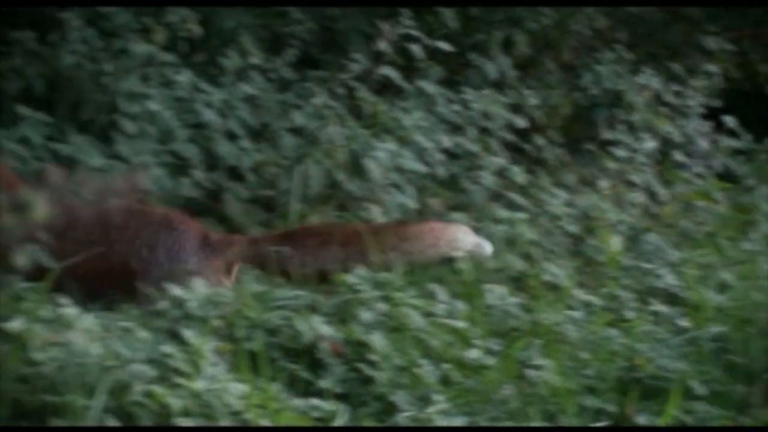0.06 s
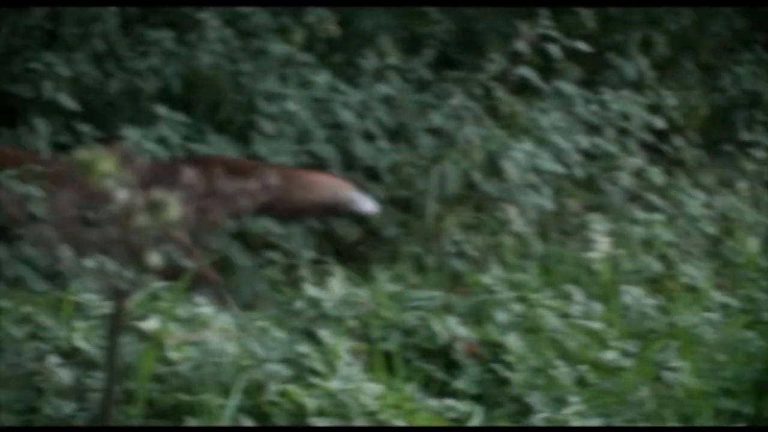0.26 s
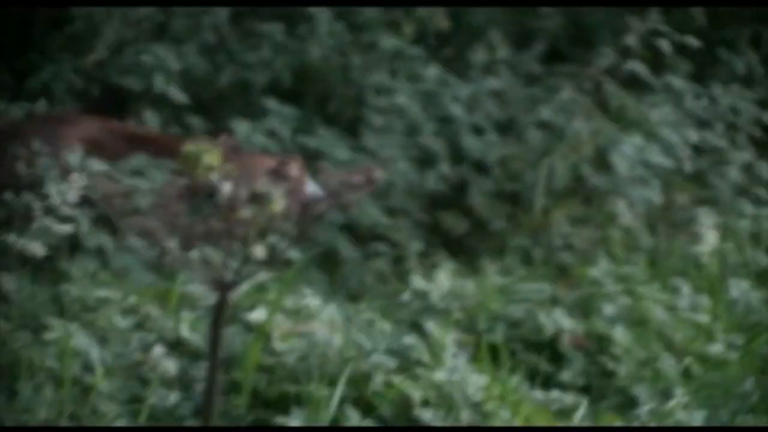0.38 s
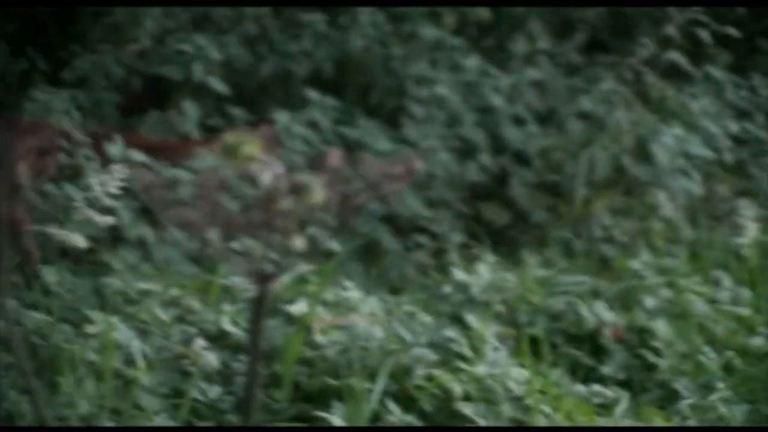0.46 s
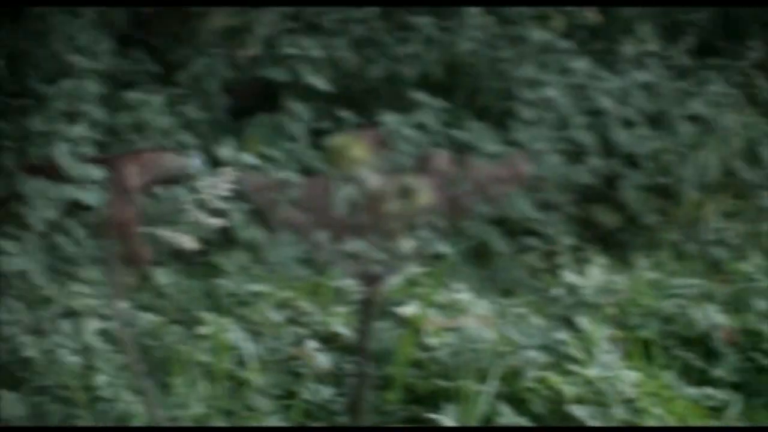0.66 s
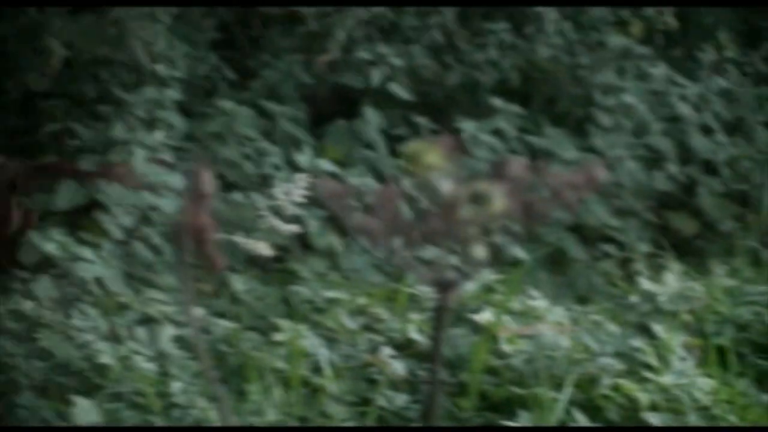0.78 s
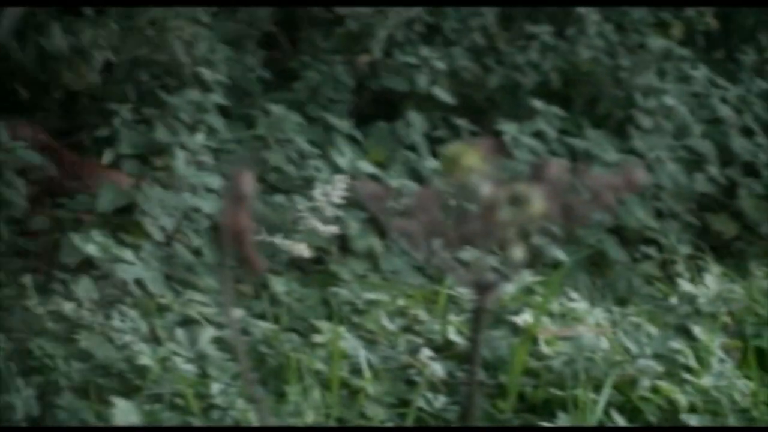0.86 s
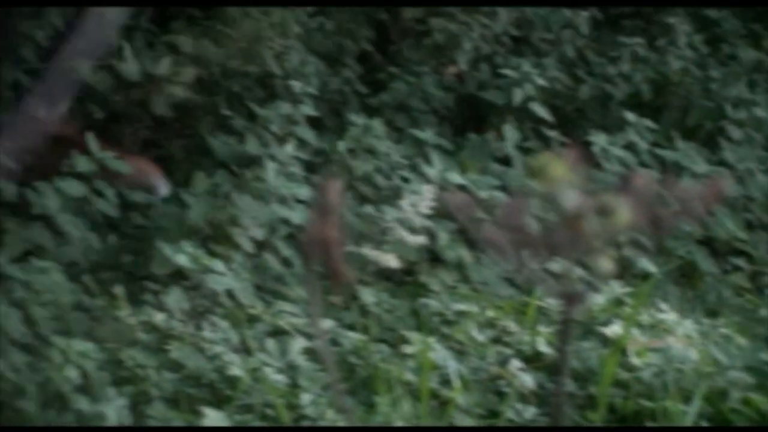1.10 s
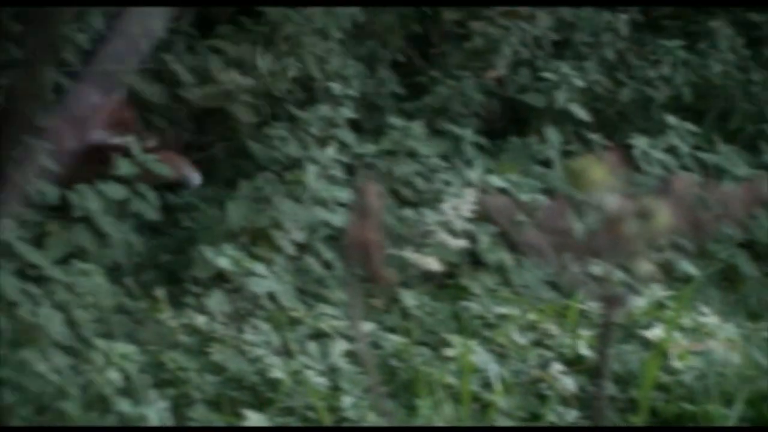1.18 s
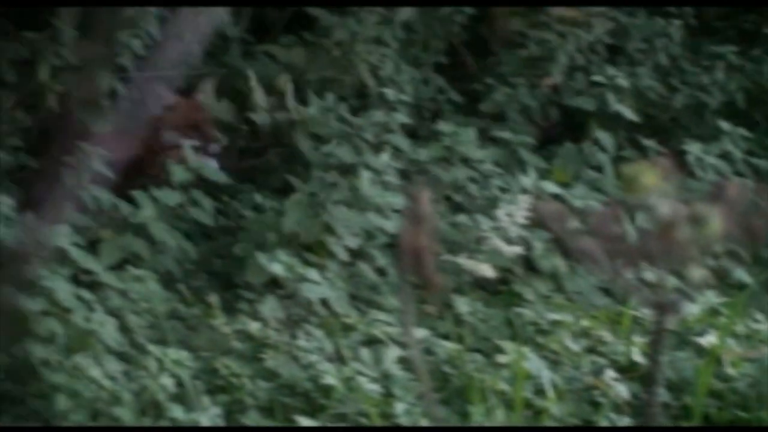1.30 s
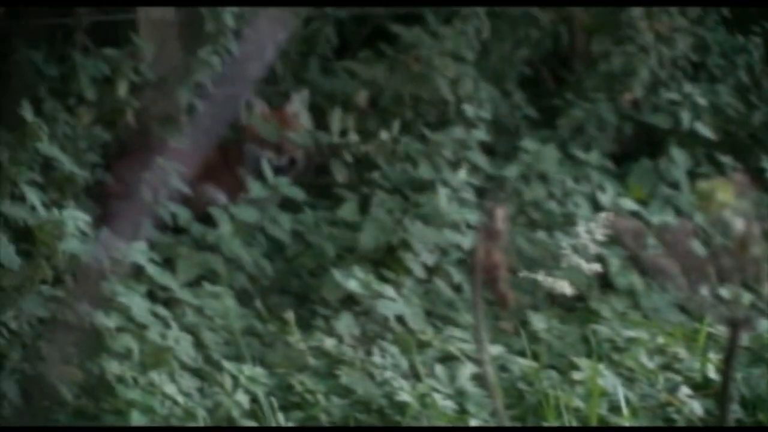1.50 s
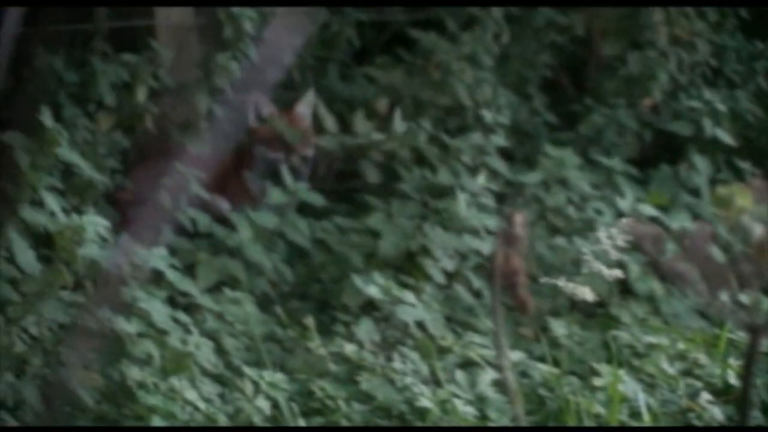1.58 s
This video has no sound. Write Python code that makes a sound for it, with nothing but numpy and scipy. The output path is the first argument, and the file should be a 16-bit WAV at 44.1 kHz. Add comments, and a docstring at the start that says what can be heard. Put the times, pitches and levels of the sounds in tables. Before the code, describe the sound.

A bird flushes in a quiet wood. After faint air, leaves rustle and twigs snap sharply from 0.2 seconds as a fox pushes through. Soft loose flaps and high squeaks come around 0.4-0.8, with stem knocks near 0.8-0.9. From 0.93 to about 1.4 a loud whirr of hollow, feathery double thumps crosses toward the right, with shrill, raspy whistles until 1.3, then fades into thinning rustle.

```python
"""A bird flushes from dense undergrowth: loose wing flaps, then a whirr at fourteen beats a second.
Each beat has two strokes, each a swish of feathers, a puff of air and a hollow, sagging thump.
Shrill alarm notes are gliding whistles; shaking their pitch makes some of them harsh.
A fox pushes through: leaves rustle as sprays of grains, twigs snap as noise bursts, stems knock
as short tones. Coloured noise gives faint air and a low rumble of movement."""
import sys
import numpy as np
from scipy import signal
from scipy.fft import rfft, irfft
from scipy.io import wavfile

SR = 44100
rng = np.random.default_rng(int(sys.argv[2]) if len(sys.argv) > 2 else 0)


def bounce(signal):
    """Save signal as a 16-bit WAV file at the path given by the first command-line argument."""
    frames = np.transpose(np.atleast_2d(signal))
    limited = np.clip(frames, -1, 1)
    pcm = np.round(limited * 32767).astype(np.int16)
    wavfile.write(sys.argv[1], SR, pcm)


N = 72765  # length in samples


def amp(db):
    """Turns decibels into a gain."""
    return 10 ** (np.asarray(db) / 20)


def unit(x):
    """Scales a signal to rms 1."""
    return x / np.sqrt(np.mean(x ** 2) + 1e-20)


def read(points, hz):
    """Reads a table of (Hz, value) between its points, on a log-frequency axis."""
    table_hz, value = np.transpose(points)
    return np.interp(np.log(hz + 1), np.log(table_hz + 1), value)


def level(points):
    """Turns a table of (seconds, dB) into a gain over time."""
    return amp(np.interp(np.arange(N) / SR, *np.transpose(points)))


def colour(x, points):
    """Gives a signal the spectrum of a table of (Hz, dB), at rms 1."""
    gain = amp(read(points, np.fft.rfftfreq(N, 1 / SR)))
    return unit(irfft(rfft(x) * gain, N))


def noise(points, apart):
    """Makes coloured stereo noise; apart is the size of side against mid."""
    mid, side = rng.standard_normal((2, N))
    return colour(np.array([mid + apart * side, mid - apart * side]), points)


def wander(seconds):
    """Makes smooth random movement of rms 1 that changes over the given time."""
    hz = np.fft.rfftfreq(N, 1 / SR)
    smoothing = np.exp(-(2 * hz * seconds) ** 2)
    return unit(irfft(rfft(rng.standard_normal(N)) * smoothing, N))


def pan(db):
    """Gives the two channel gains for a left-right difference in dB; positive is left."""
    return amp(np.array([[.5], [-.5]]) * db)


def since(s):
    """Gives the time since s, zero before it."""
    return np.maximum(np.arange(N) / SR - s, 0)


def burst(s, rise, fall):
    """Makes an envelope with a quick rise to 1 and an exponential decay."""
    t = since(s)
    return np.minimum(t / rise, 1) * np.exp(-np.maximum(t - rise, 0) / fall)


# How long sound lingers among the trees. Each row: frequency in Hz, time to die by 60 dB in seconds.
WOOD_DECAY = [(300, 0.14), (2500, 0.44), (9000, .34)]


def wood(x):
    """Adds diffuse scatter from trunks and leaves, each band dying at its own speed."""
    hz, t, bands = signal.stft(rng.standard_normal((2, SR // 2)), SR, nperseg=256)
    decay = amp(-60 * t / read(WOOD_DECAY, hz)[:, None])
    tail = signal.istft(bands * decay, SR, nperseg=256)[1]
    tail = tail + 0.13 * tail[::-1]  # each side shares a little with the other
    tail = np.pad(tail, ((0, 0), (SR // 200, 0)))  # starts 5 ms late
    return signal.fftconvolve(x, tail / np.linalg.norm(tail[0]), axes=1)[:, :N]


def thicket(x):
    """Makes quick reflections from the ground and the nearest stems."""
    taps = rng.standard_normal((2, N)) * burst(0.00044, rise=0.003, fall=0.0062)
    return signal.fftconvolve(x, taps / np.linalg.norm(taps[0]), axes=1)[:, :N]


# Colour of the still air of the wood. Each row: frequency in Hz, strength in dB.
AIR_COLOUR = [(100, 1.5), (850, 9), (2500, -3), (7000, -15), (15000, -37)]
AIR_DB = -51.5


def still_air():
    """Wide, faint, steady noise stands for the air of the wood."""
    return amp(AIR_DB) * noise(AIR_COLOUR, apart=0.94)


# Loudness of the low rumble of movement. Each row: time in seconds, level in dB.
RUMBLE_LEVEL = [(.19, -53.5), (.29, -44), (.72, -49), (.795, -41.5), (.87, -51), (1, -44), (1.45, -53)]
# Colour of the rumble. Each row: frequency in Hz, strength in dB.
RUMBLE_COLOUR = [(12, -16), (32, -3.5), (65, -13.5), (103, 1.5), (135, -6.5), (400, -37.5)]


def rumble():
    """Low, nearly central noise swells with the movement."""
    return level(RUMBLE_LEVEL) * noise(RUMBLE_COLOUR, apart=0.2)


# Loudness of the rustling leaves before clumping. Each row: time in seconds, level in dB.
RUSTLE_LEVEL = [(.205, -58), (.215, -42), (.245, -40.5), (.32, -40.5), (.39, -46.5), (.455, -38),
                (.5, -46.5), (.62, -44), (.75, -56.5), (.815, -40), (.89, -57), (.96, -42), (1.39, -48.5),
                (1.46, -56.5)]
# Colour of the leaves. Each row: frequency in Hz, strength in dB.
LEAF_COLOUR = [(100, -5), (350, 9.5), (1900, 0), (8000, -1.5), (15000, -13.5)]
GRAINS_PER_S, GRAIN_SPREAD_DB = 7000, 2.8
CLUMP_DB, CLUMP_S = 2, .007


def rustle():
    """Leaves crackle in a dense spray of tiny grains, uneven in strength and place."""
    grains = rng.standard_normal(N) * (rng.random(N) < GRAINS_PER_S / SR)
    grains = grains * amp(GRAIN_SPREAD_DB * np.minimum(rng.exponential(1, N), 4))
    place = 0.4 * rng.standard_normal(N)
    spray = colour(grains * np.array([1 + place, 1 - place]), LEAF_COLOUR)
    clumps = amp(CLUMP_DB * wander(CLUMP_S))
    return level(RUSTLE_LEVEL) * clumps * spray


# Snaps of twigs. Each row: start in seconds, level in dB.
TWIG_SNAPS = [(0.237, -29.5), (.254, -32.5), (0.261, -35.5), (.427, -33)]
# Colour of the snaps and of the crack in each knock. Each row: frequency in Hz, strength in dB.
SNAP_COLOUR = [(200, -31), (1800, 12), (2800, -6), (15000, -3.5)]
# Knocks of stems and stiff leaves. Each row: start in seconds, level in dB, pitch in Hz.
STEM_KNOCKS = [(.238, -26, 1700), (.292, -31, 1890), (.334, -29.5, 1660), (.36, -27, 930),
               (.801, -29.5, 1280), (0.886, -23.5, 940), (.891, -24, 730), (.899, -25.5, 655)]
KNOCK_T60_S, KNOCK_CRACK_DB = 0.014, -13.5  # time to die by 60 dB; crack against ring


def snaps_and_knocks():
    """Twigs break in bursts of noise; struck stems ring as short tones, each with a soft crack."""
    cracks, ring = np.zeros((2, N))
    for s, db in TWIG_SNAPS:
        cracks += amp(db) * burst(s, rise=0.00021, fall=0.005)
    for s, db, hz in STEM_KNOCKS:
        t = since(s)
        ring += amp(db - 60 * t / KNOCK_T60_S) * np.sin(2 * np.pi * hz * t)
        cracks += amp(db + KNOCK_CRACK_DB) * burst(s, rise=0.00075, fall=0.0019)
    return ring + cracks * noise(SNAP_COLOUR, apart=0.33)


LEAF_WET_DB, LEAF_PAN_DB = -5, 2  # scatter against direct sound; left against right


def undergrowth():
    """Rustle, snaps and knocks scatter among the trees, a little to the left."""
    direct = rustle() + snaps_and_knocks()
    return pan(LEAF_PAN_DB) * (direct + amp(LEAF_WET_DB) * wood(direct))


# Notes of the birds; the faint 2.5 kHz note at 0.736 s is a more distant bird. Each row: start in seconds,
# length in seconds, start pitch in Hz, end pitch in Hz, # level in dB before the fade and the mix, rasp (rms
# size of the pitch shake) in Hz.
ALARM_NOTES = [(0.387, 0.021, 6350, 6500, -33.5, 156), (0.401, 0.05, 9450, 9600, -35.5, 100),
               (0.395, 0.05, 8600, 7950, -36.5, 172), (0.423, 0.024, 7600, 5300, -31, 570),
               (0.512, .03, 5240, 5525, -35.5, 260), (.515, 0.0085, 6900, 7050, -27.5, 139),
               (.516, 0.049, 8700, 6200, -33, 897.4), (.544, 0.025, 5690, 5640, -30, 80.2),
               (0.568, .05, 5640, 5560, -56.5, 150), (.736, 0.09, 2520, 2560, -50, 35),
               (.927, 0.049, 10000, 9550, -30.5, 130), (.928, 0.12, 8500, 8200, -32, 593),
               (0.923, .12, 6450, 5300, -36, 461), (1.018, 0.051, 6960, 7090, -31.5, 70),
               (1.115, 0.062, 5920, 6120, -28.5, 135), (1.169, 0.027, 4560, 4580, -38.5, 65.6),
               (1.173, 0.049, 5900, 5780, -34, 150), (1.269, 0.042, 5000, 4480, -34, 199),
               (1.237, 0.086, 5900, 5450, -40.5, 108)]
NOTE_RISE_S, NOTE_FALL_S, NOTE_FADE_DB = .005, .008, -4.5  # the fade runs from start to end
NOTE_ARCH_HZ, RASP_PER_S = 89.1, 400  # upward bend at mid-note; speed of the pitch shake
OVERTONE_DB, OVERTONE_TOP_HZ = -14, 13170
NOTE_DRY_DB, NOTE_WET_DB, NOTE_PAN_DB = -3, -3.5, -1


def alarm():
    """Arched, fading whistles; a fast uneven shake of pitch makes some of them rasp."""
    voice = np.zeros(N)
    for s, length, start_hz, end_hz, db, rasp_hz in ALARM_NOTES:
        t = since(s)
        along = np.minimum(t / length, 1)  # 0 at the start of the note, 1 at its end
        glide = start_hz + (end_hz - start_hz) * along
        arch = glide + NOTE_ARCH_HZ * np.sin(np.pi * along)
        shake = rasp_hz * wander(.5 / RASP_PER_S)
        phase = 2 * np.pi * np.cumsum(arch + shake) / SR
        rise = np.minimum(t / NOTE_RISE_S, 1)
        fall = np.clip((length - t) / NOTE_FALL_S + .5, 0, 1)
        overtone = amp(OVERTONE_DB) * (2 * arch < OVERTONE_TOP_HZ) * np.sin(2 * phase)
        whistle = np.sqrt(2) * (np.sin(phase) + overtone)
        voice += amp(db + NOTE_FADE_DB * along) * rise * fall * whistle
    both = np.array([voice, voice])
    near = amp(NOTE_DRY_DB) * (both + .5 * thicket(both))
    return pan(NOTE_PAN_DB) * (near + amp(NOTE_WET_DB) * wood(both))


# Beats of the wings. Each row: start in seconds, first thump level in dB, its pitch in Hz,
# second thump level in dB, its pitch in Hz, feather swish level in dB.
# Each pitch is the one at the thump's peak.
WINGBEATS = [(0.446, -33.5, 481, -46, 644, -40), (.524, -35, 580, -31.5, 683, -37.5),
             (.597, -34, 690, -39, 524, -39), (0.76, -36.5, 623, -29, 537, -41),
             (.932, -19.5, 550, -20.5, 525, -32), (1.002, -25.5, 472, -22, 500, -30.5),
             (1.074, -20.5, 510, -17.5, 411.5, -31.5), (1.1442, -23, 457, -20, 442, -28.5),
             (1.217, -21.5, 471, -16, 381, -29.5), (1.289, -22, 612, -20, 411, -29),
             (1.363, -29, 368, -27, 366, -30.5)]
# Colour of the feathers. Each row: frequency in Hz, strength in dB.
FEATHER_COLOUR = [(300, -2), (900, 6.5), (1400, -4.5), (2000, -2.5), (2350, 11), (2700, 0), (3150, 6),
                  (3900, -8), (7000, -11), (15000, -28)]
# Colour of the puff of air. Each row: frequency in Hz, strength in dB.
PUFF_COLOUR = [(200, -33), (350, 6), (550, 1.5), (1400, -30)]
# Bass that each beat sets ringing. Each row: pitch in Hz, level against the swish level in dB,
# time to die by 60 dB in seconds.
BASS_THROB = [(39.15, -12, 0.81), (112.9, -10.5, 0.5)]
STROKE_GAP_S, PEAK_S, SECOND_PEAK_S = .0185, .0045, .0062  # each peak is timed from its stroke
THUMP_SHAPE, SAG_PER_S = 3.2, 20  # higher shape, shorter thump; rate of the pitch sag
SWISH_LEAD_S, SWISH_RISE_S, SWISH_FALL_S = .0012, 0.0027, 0.0093
SECOND_SWISH_DB, PUFF_DB = -3.5, -8.5  # against the first swish; against the thump
FEATHER_GRAIN_DB, FEATHER_GRAIN_S = 3, .0007
WING_ECHO_DB, WING_WET_DB = -14, -10.5  # quick reflections; scatter of the wood
WING_PAN_DB_PER_S, WING_CENTRE_S = -5.5, 0.8  # the bird crosses from left to right


def wings():
    """Each stroke is a feather swish, a puff and a hollow thump that sags in pitch; bass throbs below."""
    thump, swish, puff, throb = np.zeros((4, N))
    for s, first_db, first_hz, second_db, second_hz, swish_db in WINGBEATS:
        strokes = (
            (s, first_db, first_hz, PEAK_S, swish_db),
            (s + STROKE_GAP_S, second_db, second_hz, SECOND_PEAK_S, swish_db + SECOND_SWISH_DB),
        )
        for at, db, hz, peak, feather_db in strokes:
            t = since(at)
            push = amp(db) * (t / peak * np.exp(1 - t / peak)) ** THUMP_SHAPE
            pitch = (t > 0) * hz * np.exp(-SAG_PER_S * (t - peak))
            thump += push * np.sin(2 * np.pi * np.cumsum(pitch) / SR)
            puff += amp(db) * burst(at, rise=0.0045, fall=0.0064)
            swish += amp(feather_db) * burst(at - SWISH_LEAD_S, SWISH_RISE_S, SWISH_FALL_S)
        t = since(s)
        for hz, db, t60 in BASS_THROB:
            throb += amp(swish_db + db - 60 * t / t60) * np.sin(2 * np.pi * hz * t)
    slaps = unit(amp(FEATHER_GRAIN_DB * wander(FEATHER_GRAIN_S)))  # single feathers strike unevenly
    air_puffs = amp(PUFF_DB) * puff * noise(PUFF_COLOUR, apart=0.035)
    feathers = np.sqrt(2) * swish * slaps * noise(FEATHER_COLOUR, apart=0.32)
    direct = thump + air_puffs + feathers
    around = amp(WING_ECHO_DB) * thicket(direct) + amp(WING_WET_DB) * wood(direct)
    side_db = WING_PAN_DB_PER_S * (since(0) - WING_CENTRE_S)
    return pan(side_db) * (direct + around) + throb  # the bass stays central


def scene():
    """Mixes wings, alarm notes and undergrowth over the quiet of the wood."""
    return wings() + alarm() + undergrowth() + still_air() + rumble()


def record(dry):
    """Removes the treble above 15750 Hz with a steep low-pass filter."""
    lowpass = signal.firwin(511, 15750, window=("kaiser", 9), fs=SR)
    return signal.oaconvolve(dry, lowpass[None], "same")


dry = scene()
out = record(dry)
bounce(out)
```